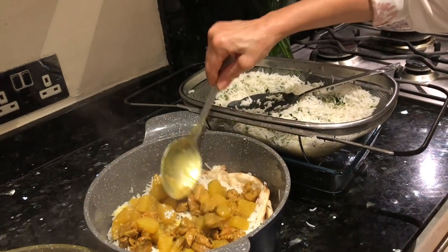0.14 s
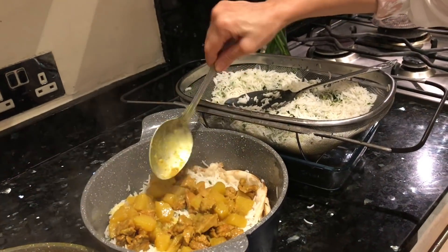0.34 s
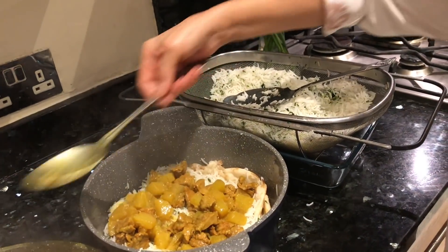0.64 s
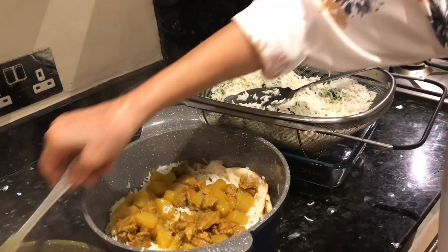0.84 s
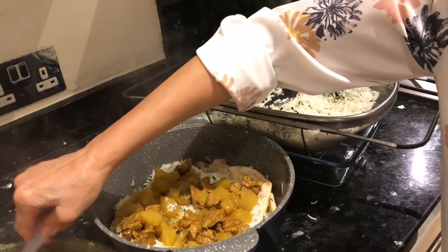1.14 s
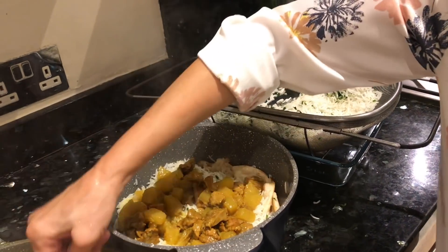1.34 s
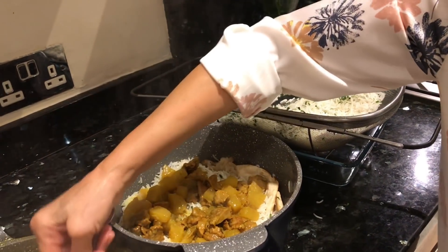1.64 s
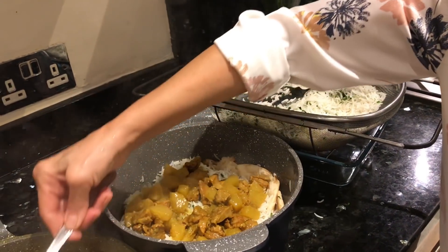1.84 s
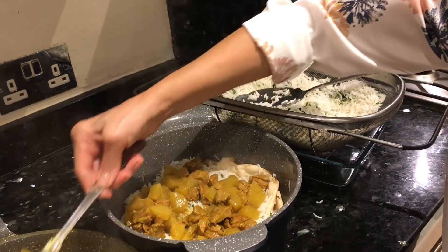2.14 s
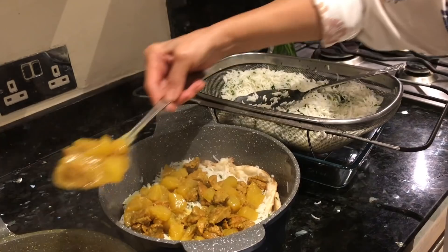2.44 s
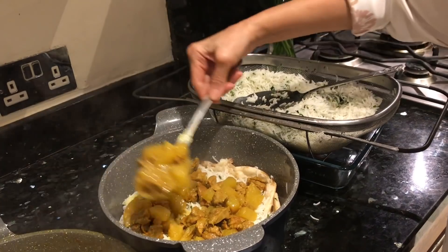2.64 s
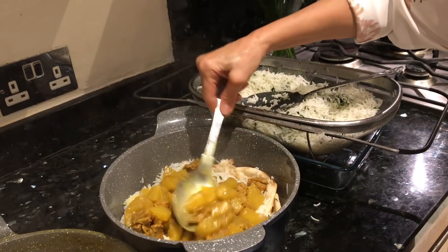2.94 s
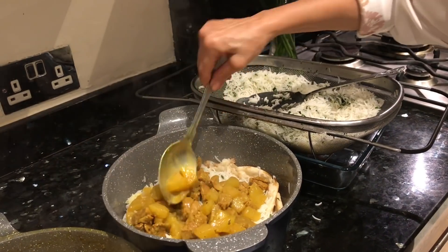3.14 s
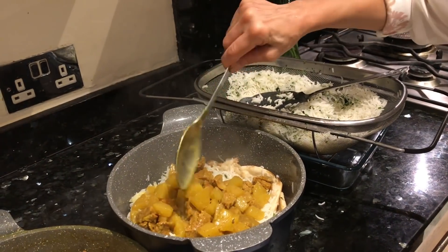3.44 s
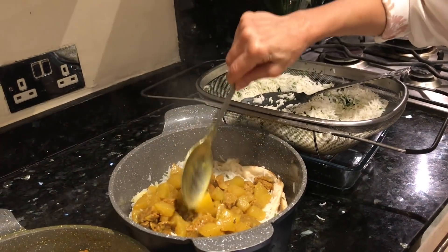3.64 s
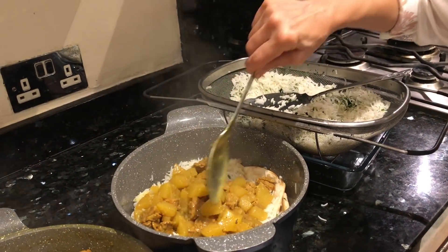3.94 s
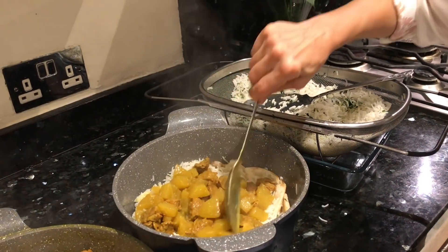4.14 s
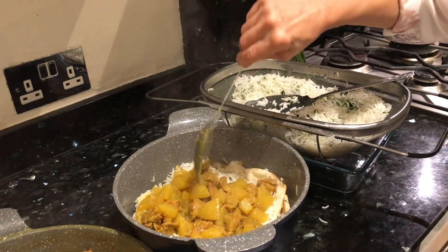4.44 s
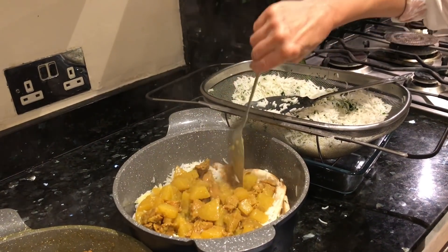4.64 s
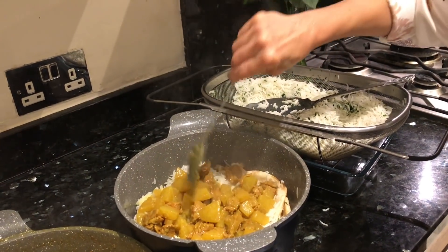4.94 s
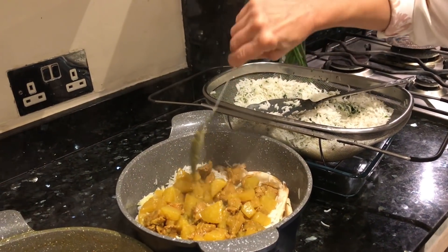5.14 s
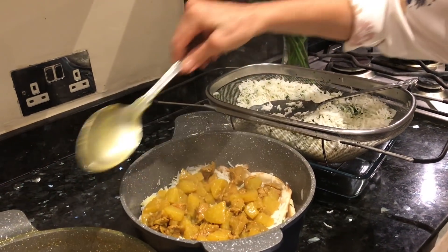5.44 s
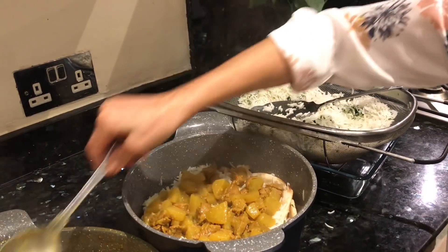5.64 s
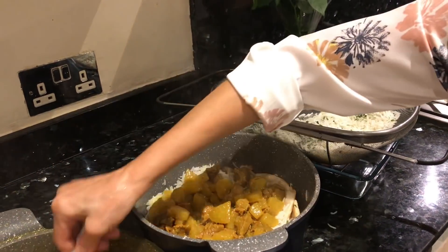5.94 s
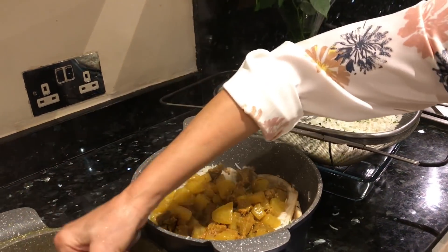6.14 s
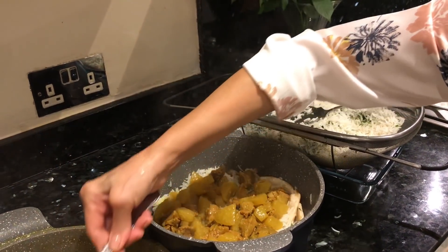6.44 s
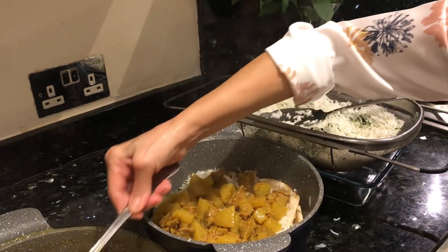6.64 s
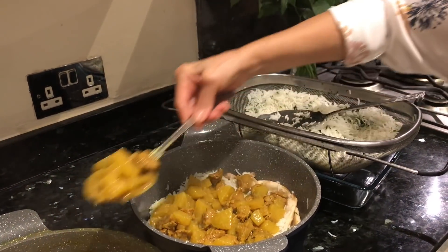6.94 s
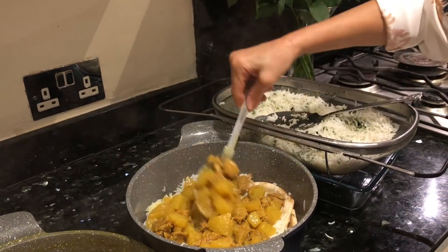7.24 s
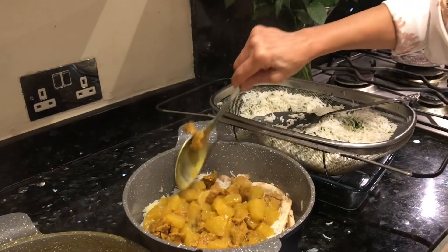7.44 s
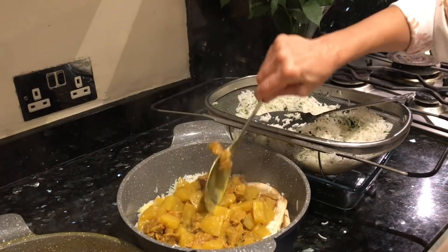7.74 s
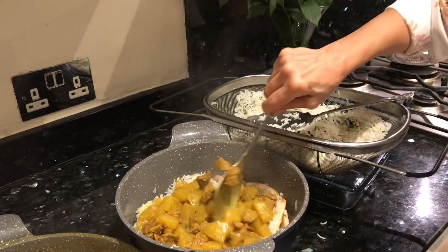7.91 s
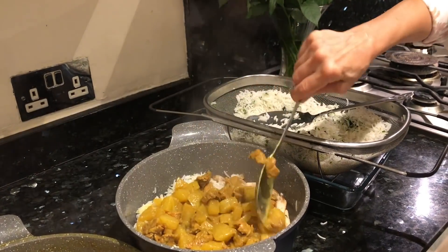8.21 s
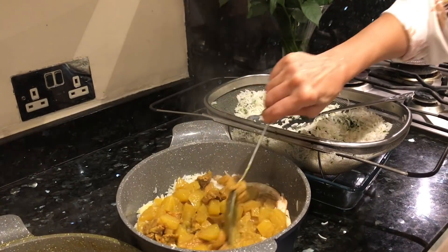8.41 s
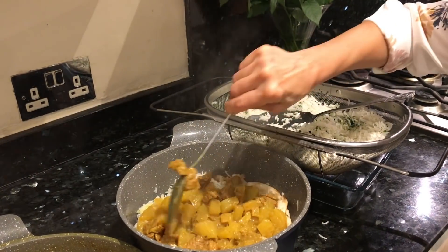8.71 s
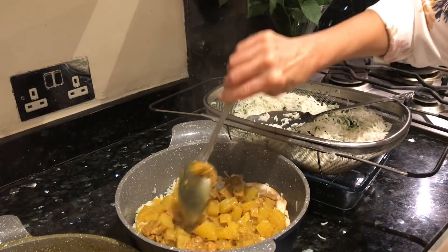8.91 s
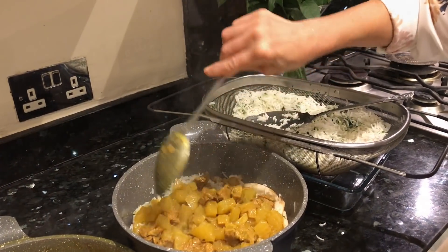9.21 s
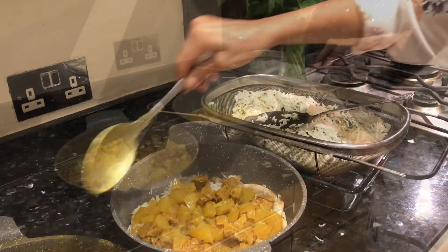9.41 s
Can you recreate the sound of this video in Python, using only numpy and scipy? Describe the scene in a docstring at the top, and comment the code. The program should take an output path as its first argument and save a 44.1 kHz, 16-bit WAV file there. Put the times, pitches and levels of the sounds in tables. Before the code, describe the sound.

A quiet kitchen with low rumble, soft air noise and faint mains hum, swelling slightly around 2.2-2.6 and 3.9-4.3 seconds. Throughout, a pot simmers some way off: irregular rising bubble blips, thin fizz and tiny crisp spits of fat, with a short room echo. At 0.5 a soft brush and low bump. At about 1.08 a steel spoon hits the pan close by, very loud, bright and briefly ringing, with a quick double contact, then a gritty scrape fading by 1.5 and small ticks near 1.2-1.3. A light tap at 1.7. From 2.4 to 5.3 only bubbling and soft food brushes, with a stronger bubble at 4.2. At 5.82 a second, duller and quieter knock, small rattles, a short scrape and a thin high falling squeak, gone by 6.3. Light taps near 6.2. Then simmering, with a barely audible squeak near 8, low rumble around 8.35 and a sharper spit at 9.1, to about 9.6.

```python
"""A steel spoon knocks twice into a pan of stew and scrapes along its bottom, close to a microphone:
contacts and slips ring the modes of the pan among bursts and rasps of noise; thin squeaks glide.
Far off a pot simmers: bubbles are rising blips, fizz is many small ones; fat spits short clicks.
Bumps, taps and brushes are noise puffs. The kitchen hums (sines), rumbles and drones (noise bands)
and throws everything back through a random echo tail."""
import sys
import numpy as np
from scipy import signal
from scipy.fft import rfft, irfft
from scipy.io import wavfile
from scipy.ndimage import uniform_filter1d

SR = 44100
rng = np.random.default_rng(int(sys.argv[2]) if len(sys.argv) > 2 else 0)


def store_pcm(level_fs):
    """Save levels as 16-bit WAV."""
    pcm = np.round(np.clip(level_fs, -1, 1) * 32767).astype(np.int16)
    wavfile.write(sys.argv[1], SR, np.atleast_2d(pcm).T)


def volts(x):
    """Linear amplitude factor 10**(x/20) for a level x in dB, scalar or array-like."""
    e = np.asarray(x, float) / 20
    return 10 ** e


N = 422037  # samples

# Modes of pan and spoon. Each row: frequency in Hz, relative level in dB, t60 in s before scaling.
PAN = [(330, -35, 0.084), (604, -19, .1), (763, -13.5, 0.1), (953, -9.5, 0.11), (1076, -8, .1),
       (1250, -10.5, 0.032), (1443, -1, 0.077), (1846, -19, 0.023), (2057, -10.5, 0.074), (2300, -11, .06),
       (2560, -13, 0.041), (2810, 0.5, .04), (2920, -2.5, 0.038), (3295, -9, 0.065), (3710, -8.5, 0.036),
       (4430, -3.5, 0.053), (4580, -10, 0.063), (819, -11.5, .1), (5550, -5.5, 0.067), (5700, -9.5, 0.078),
       (6360, -7, 0.039), (7270, -16.5, 0.066), (8220, -14.5, 0.049), (8150, -5.5, 0.011),
       (9550, -13, 0.051), (11160, -16.5, 0.061), (11800, -11, 0.032), (13300, -13, 0.022),
       (15300, -13, .02)]


def evened(x):
    """Scales to rms 1."""
    return x / np.sqrt(np.mean(x ** 2) + 1e-20)


def read(points, hz):
    """Reads a spectrum on a log-frequency axis."""
    f, value = np.transpose(points)
    return np.interp(np.log(hz + 1), np.log(f + 1), value)


def add(mix, s, sound):
    """Mixes a sound in at time s."""
    part = mix[round(s * SR):][:len(sound)]
    part += sound[:len(part)]


def colour(x, points, tilt_db=0):
    """Filters by a spectrum, tilted about 2 kHz by tilt_db per octave."""
    hz = np.fft.rfftfreq(len(x), 1 / SR)
    gain_db = read(points, hz) + tilt_db * np.log2((hz + 50) / 2000)
    return irfft(rfft(x) * volts(gain_db), len(x))


def band(x, hz, width_hz):
    """Band-pass around hz."""
    edges = np.clip([hz - width_hz / 2, hz + width_hz / 2], 5, SR / 2 - 100)
    return signal.sosfilt(signal.butter(2, edges, "bandpass", fs=SR, output="sos"), x)


def slow(rate):
    """Slow random wander of rms 1; a higher rate wanders faster."""
    t = np.arange(N) / SR
    knots = np.arange(0, t[-1] + 1, 1 / 14)
    values = uniform_filter1d(rng.standard_normal(len(knots)), max(1, round(7 / rate)))
    return evened(np.interp(t, knots, values))


def ring(hz, t60):
    """One exponentially decaying mode, cut at -60 dB."""
    t60 = max(t60, .002)
    t = np.arange(0, t60, 1 / SR)
    return volts(-60 * t / t60) * np.sin(2 * np.pi * hz * t)


def patchy(x, patch_db, bins, frames):
    """Lets the level drift in random patches of time and frequency; rms 1."""
    z = signal.stft(x, nperseg=256)[2]
    patches = uniform_filter1d(rng.standard_normal(z.shape), bins, 0)
    patches = uniform_filter1d(patches, frames, 1)
    return evened(signal.istft(z * volts(patch_db * evened(patches)), nperseg=256)[1][:len(x)])


def kitchen_air():
    """Steady air noise, low rumble and fuzzy drones from noise bands; mains buzz from sines."""
    # Air noise spectrum. Each row: frequency in Hz, relative density in dB per Hz.
    air_spectrum = [(15, -36.5), (25, -4), (44, -8), (102, -4), (157, -4), (206, -0.5), (451, -12.5),
                    (754, -13.5), (2410, -14), (5880, -20), (7710, -24.5), (8590, -24), (10400, -29),
                    (12900, -24.5), (16000, -29)]
    # Low rumble. Each row: time in s, level in dB before wander.
    rumble_level = [(0, -67), (.6, -66.5), (2.1, -71), (5.0, -65.5), (5.8, -75), (6.2, -64.5), (7.7, -67),
                    (8.35, -56.5), (8.65, -66.5), (9.57, -72.5)]
    # Fuzzy low tones of the room. Each row: centre in Hz, width in Hz, level in dB rms.
    tones = [(200.2, 14, -75), (226, 17, -74.5), (236, 36, -80)]
    # Mains buzz. Each row: frequency in Hz, level in dB rms before swell and wander, share of swell.
    hum_partials = [(100.5, -78, .6), (200.5, -73, .3), (300.5, -78, .6), (400.5, -86, .7),
                    (500.6, -89, 1.1)]
    # Two swells of the buzz. Each row: start in s, end in s.
    swells = [(2.17, 2.62), (3.92, 4.27)]
    air_db, drone_db, swell_rise_db, swell_edge_s = -62, -69, 8, .1
    drone_wander_db, rumble_wander_db, hum_wander_db = 2.2, 1.5, 2.2

    t = np.arange(N) / SR
    air = patchy(colour(rng.standard_normal(N), air_spectrum), 1.6, bins=6, frames=20)
    air = volts(air_db + .7 * slow(1)) * air
    rumble_db = np.interp(t, *np.transpose(rumble_level)) + rumble_wander_db * slow(2)
    rumble = volts(rumble_db) * evened(band(rng.standard_normal(N), 57, 27))
    drone = evened(band(rng.standard_normal(N), 122, 26))
    drone = volts(drone_db + drone_wander_db * slow(2.8)) * drone
    drones = sum(volts(db) * evened(band(rng.standard_normal(N), hz, width_hz))
                 for hz, width_hz, db in tones)
    swell_db = sum(swell_rise_db * np.clip(np.minimum(t - on, off - t) / swell_edge_s + .5, 0, 1)
                   for on, off in swells)
    hum = np.zeros(N)
    for hz, db, share in hum_partials:
        level = volts(db + share * swell_db + hum_wander_db * slow(3))
        hum += level * np.sqrt(2) * np.sin(2 * np.pi * (hz * t + rng.random()))
    return air + rumble + drone + drones + hum


def simmer():
    """Bubbles are short blips rising in pitch; 1800 small bursts make a fizz."""
    # Loud bubbles bursting in the pot. Each row: start in s, level in dB, starting pitch in Hz.
    loud_bubbles = [(0.059, -45.5, 1380), (0.224, -44, 1510), (0.368, -39, 1620), (0.749, -51.5, 720),
                    (1.028, -43.5, 2290), (1.608, -43.5, 3000), (1.649, -38.5, 3130), (1.678, -39.5, 2420),
                    (2.429, -40, 2300), (2.779, -46, 2720), (2.815, -50.5, 1110), (2.831, -38.5, 3980),
                    (2.939, -40, 2600), (3.261, -44, 1135), (3.358, -43, 2445), (3.442, -45.5, 1940),
                    (3.527, -44.5, 2126), (3.695, -48, 1250), (3.756, -46, 1663), (3.895, -41.5, 1870),
                    (4.147, -42.5, 1780), (4.182, -33, 1750), (4.419, -50.5, 1410), (4.481, -49.5, 1770),
                    (4.525, -52.5, 1980), (4.979, -43, 1935), (5.338, -38.5, 2250), (5.621, -45, 1445),
                    (5.675, -39, 2390), (6.375, -44, 2330), (6.467, -39, 3220), (7.076, -40, 4240),
                    (7.538, -42, 1343), (7.637, -40.5, 2500), (7.721, -37.5, 2550), (8.006, -41.5, 2270),
                    (8.035, -44, 750), (8.07, -45, 1000), (8.241, -41.5, 3410), (8.296, -44, 1223),
                    (8.734, -42.5, 3110), (8.804, -40, 3470), (8.995, -42, 2470)]
    # Fizz spectrum. Each row: frequency in Hz, relative density in dB per Hz.
    fizz_spectrum = [(410, -32), (700, -5.5), (1090, -0.5), (1380, -3), (1970, -6.5), (2630, 0),
                     (4990, -5.5), (13000, -15), (16000, -17)]
    # How hard it simmers. Each row: time in s, fizz level in dB.
    boil = [(0, -64), (.46, -65.5), (.9, -73), (1.601, -69), (2.15, -73.5), (2.4, -69), (2.9, -69),
            (3.4, -68), (4.021, -69.5), (4.9, -73), (5.28, -65.5), (5.75, -70), (6.7, -73), (7.01, -68.5),
            (7.32, -73), (8.1, -66.5), (8.85, -73.5), (9.3, -67), (9.57, -80)]
    pop_db, pop_spread_db, pop_low_hz, pop_high_hz = -54, 6, 1200, 3800
    rise_cycles, ring_cycles = 1.9, 26  # low bubbles swell and ring longer

    out, t = np.zeros(N), np.arange(2048) / SR
    # middling bubbles at random
    pops = [(s * N / SR, pop_db + pop_spread_db * size, pop_low_hz * (pop_high_hz / pop_low_hz) ** pitch)
            for s, size, pitch in rng.random((60, 3))]
    for s, db, hz in list(loud_bubbles) + pops:
        tone = np.sin(2 * np.pi * hz * (t + 6 * t ** 2))
        rise = np.sin(np.pi / 2 * np.minimum(t * hz / rise_cycles, 1)) ** 2
        add(out, s, volts(db - 60 * t * hz / ring_cycles) * rise * tone)
    fizz = np.zeros(N)
    for hz in np.geomspace(1500, 14000, num=30):
        t60 = 25 / hz
        rise = np.minimum(np.arange(0, max(t60, .002), 1 / SR) * hz / 3, 1)
        grain = volts(read(fizz_spectrum, hz)) * np.sqrt(hz) * evened(ring(hz, t60) * rise)
        for when, size in rng.random((60, 2)):
            add(fizz, when * N / SR, grain * (1.06 - size) ** -.55)  # a few are large
    return out + volts(np.interp(np.arange(N) / SR, *np.transpose(boil))) * evened(fizz)


def spits():
    """Spits of fat are short decaying noise clicks: loud ones and a random spatter of small ones."""
    # Loud spits. Each row: start in s, peak in dB before the microphone, centre in Hz.
    loud_spits = [(0.2259, -47, 14100), (0.5367, -42.5, 9100), (0.5947, -44, 6405), (1.349, -46, 6700),
                  (1.5653, -43.5, 10130), (1.5878, -44.5, 6530), (1.6786, -46.5, 11580),
                  (2.9956, -45, 6700), (3.2365, -48.5, 6690), (4.0652, -43, 12500), (5.0025, -46.5, 7960),
                  (5.123, -43.5, 6650), (6.1374, -44.5, 9800), (6.2312, -45, 11800), (6.4118, -46, 10120),
                  (6.4682, -44.5, 15140), (6.7306, -48, 6970), (7.0723, -47.5, 6900),
                  (7.2205, -48.5, 12670), (7.7144, -46.5, 10360), (8.3305, -47, 6650), (9.0984, -38, 7900)]
    spatter_db = -60.5

    small = [(s * N / SR, spatter_db + 11 * size ** 2.5, 5000 + 9500 * pitch)
             for s, size, pitch in rng.random((280, 3))]
    out, t = np.zeros(N), np.arange(600) / SR
    for s, db, hz in list(loud_spits) + small:
        puff = band(rng.standard_normal(len(t)) * volts(-60 * t / .012), hz, 0.41 * hz)
        add(out, s, volts(db) * puff / abs(puff).max())
    return out


def thud(rows, rise_s, width):
    """Damped puffs of band noise; width is a share of the centre frequency."""
    out, t = np.zeros(N), np.arange(12000) / SR
    for s, db, hz, t60 in rows:
        puff = evened(band(rng.standard_normal(len(t)), hz, width * hz))
        add(out, s, volts(db - 60 * t / t60) * np.minimum(t / rise_s, 1) * puff)
    return out


def brushes():
    """Soft brushes of spoon and food: noise puffs with a slow rise."""
    # Brushes. Each row: start in s, level in dB, centre in Hz, t60 in s.
    rows = [(0.515, -50.5, 1200, 0.27), (0.525, -52, 3800, .2), (2.4, -53.5, 2600, 0.21),
            (2.97, -52, 2840, .15), (4.55, -53, 3270, 0.13), (5.25, -50, 745, .11), (8.1, -59.5, 400, 0.58)]
    return thud(rows, rise_s=.026, width=0.94)


def bumps():
    """Dull bumps of spoon and food: low noise puffs with a quick rise."""
    # Bumps. Each row: start in s, level in dB, centre in Hz, t60 in s.
    rows = [(0.53, -47.5, 234, 0.34), (1.0781, -29.5, 175, 0.051), (5.822, -48.5, 171, 0.22)]
    return thud(rows, rise_s=0.0021, width=1)


def knocks():
    """Each contact rings all modes of the pan and spits a short burst of noise."""
    # Contacts of spoon on pan. Each row: start in s, level in dB, treble tilt in dB per octave,
    # ring against crack in dB, factor on the modes' t60.
    contacts = [(1.0751, -1.5, 3, -16.5, 1.3), (1.0791, -12.5, -2, -2.5, 0.99),
                (1.0808, -8.5, 7.5, -18, 0.78), (1.1861, -33, 2, -3, .6), (1.302, -27, 7, -36, 0.55),
                (1.318, -50, 7, -4, 0.77), (5.8199, -15.5, -2.5, -5.5, 0.77), (5.8603, -40, -1, 1, .45),
                (5.88, -27, -2, -1, 0.66), (5.903, -25.5, 3.5, -5.5, 0.37), (6.028, -27.5, 12, -26.5, 0.27),
                (6.06, -39, -2, -5, 1.16)]
    # Burst of the contact itself. Each row: frequency in Hz, relative density in dB per Hz.
    crack = [(59, -56.5), (100, -21), (398, -20.5), (1060, 4), (2170, -18.5), (2860, -2), (4020, -11.5),
             (6150, -6), (6990, -6.5), (16000, -21.5)]
    crack_t60_s, rise_s = 0.057, 0.0011

    out, t = np.zeros(N), np.arange(4096) / SR
    for s, db, tilt_db, ring_db, free in contacts:
        burst = evened(colour(rng.standard_normal(len(t)), crack, tilt_db))
        hit = 0.3 * burst * volts(-60 * t / crack_t60_s)
        place = rng.standard_normal(len(PAN))  # the point struck favours some modes
        for (hz, mode_db, t60), p in zip(PAN, place):
            level_db = mode_db + ring_db + 1.5 * p + tilt_db * np.log2(hz / 2000)
            add(hit, 0, volts(level_db) * ring(hz, free * t60))
        add(out, s, volts(db) * hit * np.minimum(t / rise_s, 1))
    return out


def scrape(rows):
    """Uneven slips of the dragged spoon excite the modes and a broad rasp."""
    # Rasp between the modes. Each row: frequency in Hz, relative density in dB per Hz.
    grit = [(180, -56.5), (300, -24.5), (814, 1.5), (1340, 1.5), (1460, -5), (1640, -12), (2280, -1),
            (5340, -16), (7820, -19.5), (11500, -27.5), (16000, -39.5)]
    slips_per_s = 1500

    s, db, tilt_db = np.transpose(rows)
    t = np.arange(s[0], s[-1], 1 / SR)
    tilt_db = np.interp(t, s, tilt_db)
    slips = rng.random(len(t)) < slips_per_s / SR
    slips = slips * volts(2.8 * np.minimum(rng.exponential(1, len(t)), 4))
    modes = np.zeros(len(t))
    for hz, mode_db, t60 in PAN:
        soft_db = (tilt_db - 3) * np.log2(hz / 2000)  # a slip is softer than a blow
        # the moving tip favours other modes
        place_db = 4 * evened(uniform_filter1d(rng.standard_normal(len(t)), 1800))
        share = slips * rng.standard_normal(len(t)) * volts(mode_db + soft_db + place_db)
        modes += signal.oaconvolve(share, ring(hz, 0.72 * t60))[:len(t)]
    puffs = np.sqrt(signal.lfilter([1], [1, -.985], slips ** 2) + 3)
    rasp = patchy(colour(puffs * rng.standard_normal(len(t)), grit), 3.5, bins=3, frames=8)
    treble = band(rasp, 11000, 13000)
    rasp = rasp + (volts(2.0 * tilt_db + 3.0) - 1) * treble
    sound = 0.6 * evened(modes) + 0.76 * evened(rasp)
    level = np.sqrt(uniform_filter1d(sound ** 2, 2000) + 1e-9)
    pressure = volts(np.interp(t, s, db))  # sets the loudness
    return s[0], pressure * sound / level * signal.windows.tukey(len(t), .04)


def taps():
    """Light taps of spoon and food: brief noise puffs with a sharp rise."""
    # Taps. Each row: start in s, level in dB, centre in Hz, t60 in s.
    rows = [(1.676, -46.5, 4500, .03), (6.171, -54, 3800, .025), (6.227, -44, 2560, .031)]
    return thud(rows, rise_s=.001, width=0.47)


def squeak(rows):
    """A thin gliding sine whose level wavers."""
    s, hz, db = np.transpose(rows)
    t = np.arange(s[0], s[-1], 1 / SR)
    waver = 1 + 0.66 * evened(uniform_filter1d(rng.standard_normal(len(t)), 150))
    tone = np.sin(2 * np.pi * np.cumsum(np.interp(t, s, hz)) / SR)
    return s[0], waver * volts(np.interp(t, s, db)) * tone


def room(x):
    """Kitchen echo: sparse taps of random sign, each band dying at its own speed."""
    # Reverberation of the kitchen. Each row: frequency in Hz, t60 in s.
    decay = [(200, 0.25), (1000, 0.52), (4000, 0.24), (12000, 0.7)]
    echoes = np.zeros(SR)
    at = np.arange(300, SR - 20, 20) + rng.integers(0, 20, (SR - 301) // 20)
    echoes[at] = rng.choice([-1., 1.], len(at))
    hz, t, z = signal.stft(echoes, SR, nperseg=256)
    tail = signal.istft(z * volts(-60 * t / read(decay, hz)[:, None]), SR, nperseg=256)[1]
    return signal.oaconvolve(x, tail / np.linalg.norm(tail))[:N]


def scene():
    """The near spoon is mostly dry, the far pot mostly room."""
    # Spoon dragged over the pan, one table a stroke. Each row: time in s, pressure in dB,
    # treble tilt in dB per octave.
    strokes = [
        [(1.09, -27, 7), (1.108, -28, 3), (1.236, -34.5, 1.5), (1.272, -40, -1), (1.304, -38.5, -4),
         (1.36, -49.5, 2.5), (1.58, -66, -11)],
        [(5.835, -38, -1), (5.845, -38, -2), (5.921, -29, 2), (5.965, -40, 1.5), (6.081, -47, -2.5),
         (6.12, -57, 0), (6.3, -71.5, -6)],
    ]
    # Thin high squeaks, one table each. Each row: time in s, pitch in Hz, level in dB.
    squeaks = [
        [(5.87, 12200, -63), (5.9, 11900, -54), (5.935, 11100, -41)],
        [(7.8, 11600, -80.5), (7.9, 12100, -87.5), (7.98, 11800, -75), (8.06, 11000, -88)],
    ]
    # Microphone colour. Each row: frequency in Hz, gain in dB.
    mic = [(30, -1), (6300, 2), (7500, -4), (8800, 0.5), (10500, -3), (12000, 1.5), (16000, -2)]
    near_room_db, far_room_db, spit_room_db, bump_room_db = -20, 3, -4.5, -2
    far_dry_db = -1.5

    spoon, pot, clicks = knocks(), simmer(), spits()
    puffs = bumps() + taps() + brushes()
    for rows in strokes:
        add(spoon, *scrape(rows))
    for rows in squeaks:
        add(spoon, *squeak(rows))
    wet = room(volts(near_room_db) * spoon + volts(far_room_db) * pot + volts(spit_room_db) * clicks
               + volts(bump_room_db) * puffs)
    near = colour(spoon + clicks + puffs, mic)
    return (near + volts(far_dry_db) * pot + wet + kitchen_air())[None]


def band_limit(x):
    """A steep low-pass at the top of the band."""
    return signal.sosfilt(signal.butter(12, 16570, fs=SR, output="sos"), x)


def record(dry):
    """The microphone cuts the deepest bass and the top, and clips peaks."""
    low = signal.butter(3, 32, "highpass", fs=SR, output="sos")
    top = signal.cheby2(12, 60, 16700, fs=SR, output="sos")
    mix = np.clip(signal.sosfilt(np.vstack([low, top]), dry), -.97, .97)
    return band_limit(mix)


dry = scene()
out = record(dry)
store_pcm(out)
```